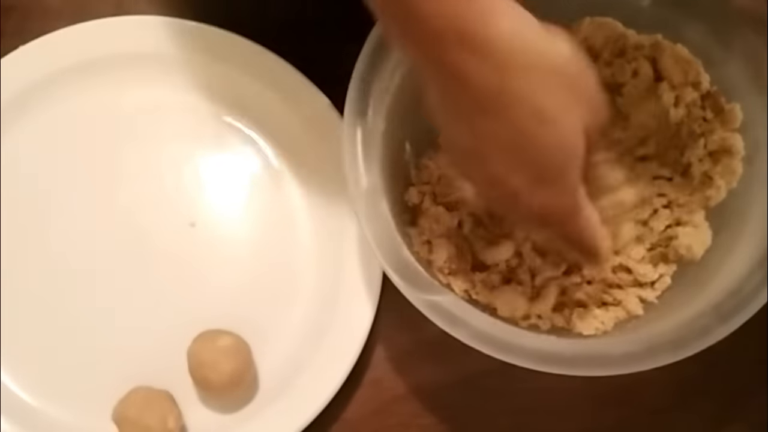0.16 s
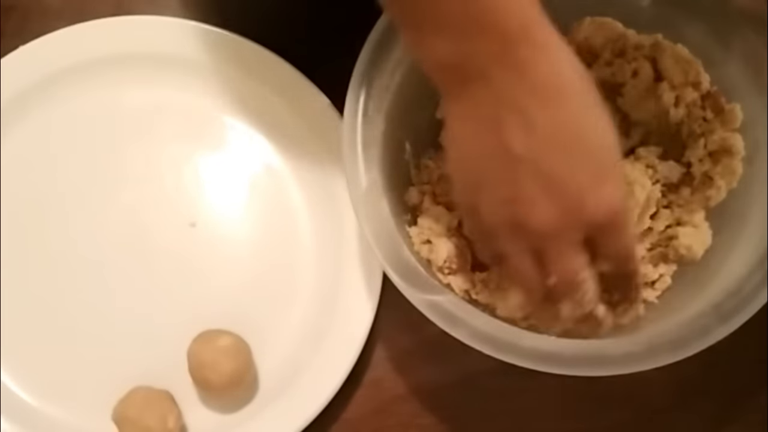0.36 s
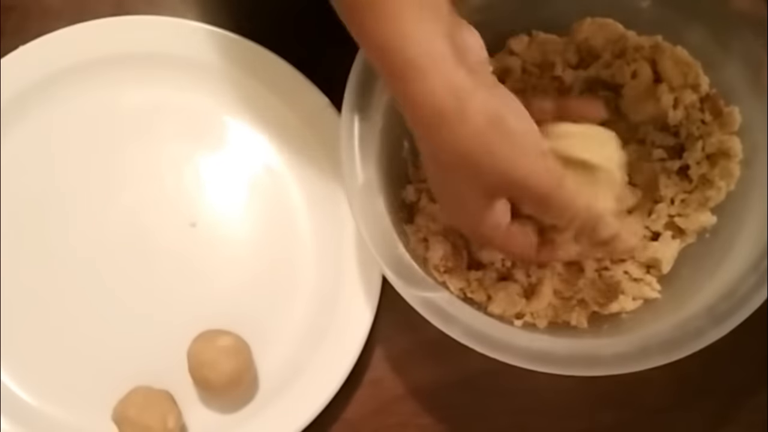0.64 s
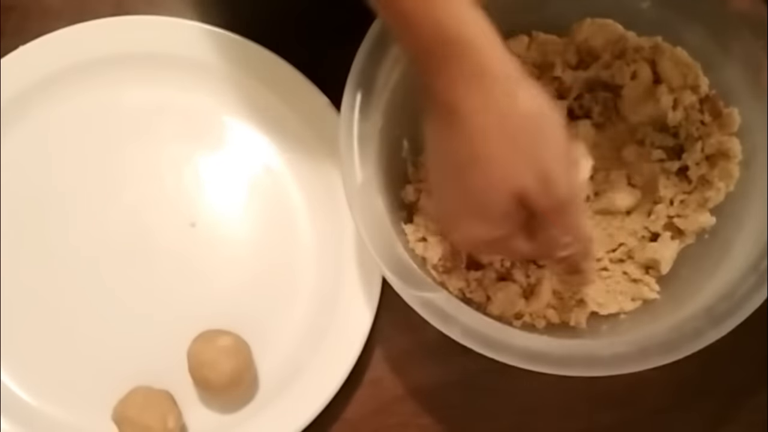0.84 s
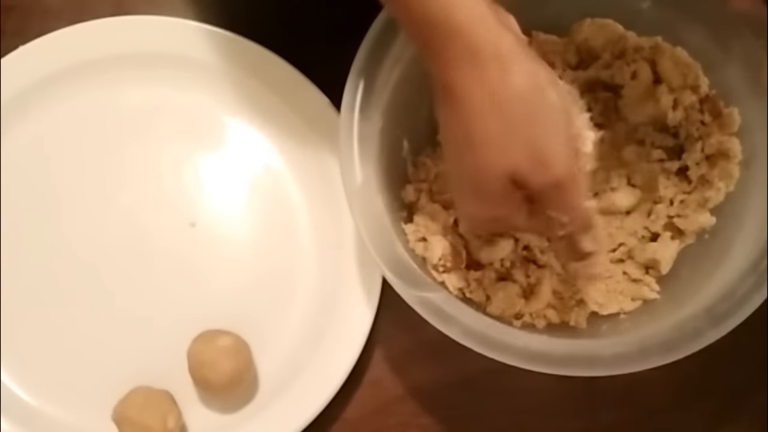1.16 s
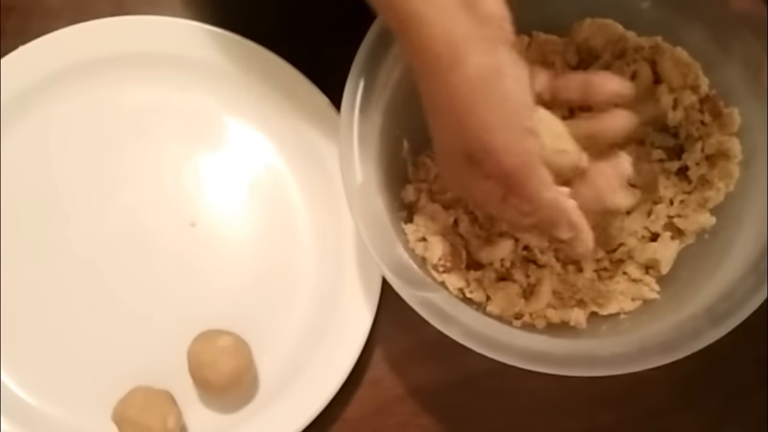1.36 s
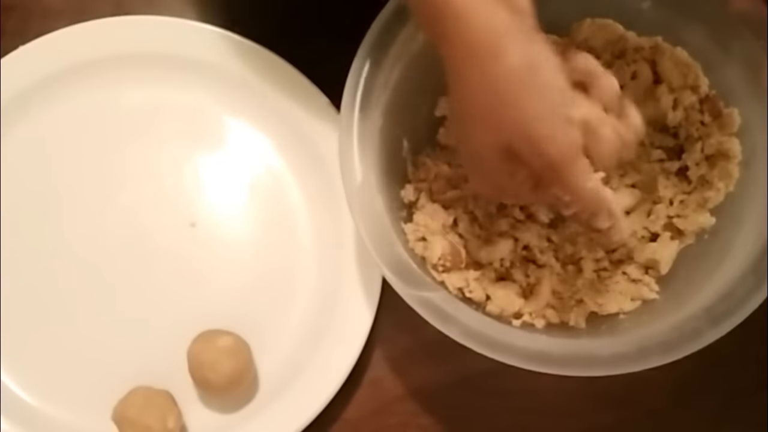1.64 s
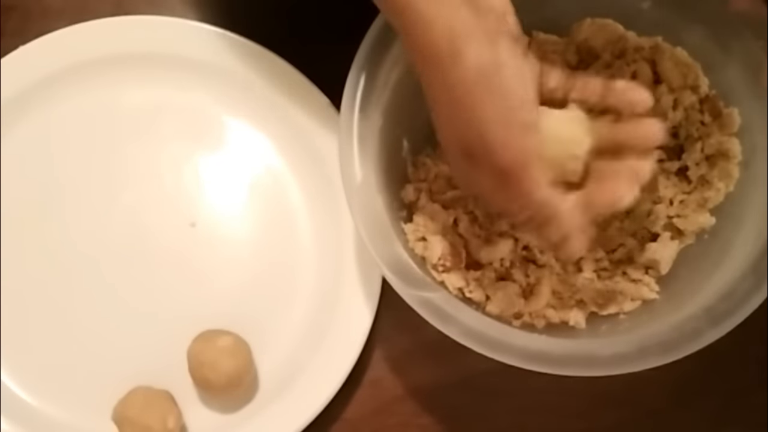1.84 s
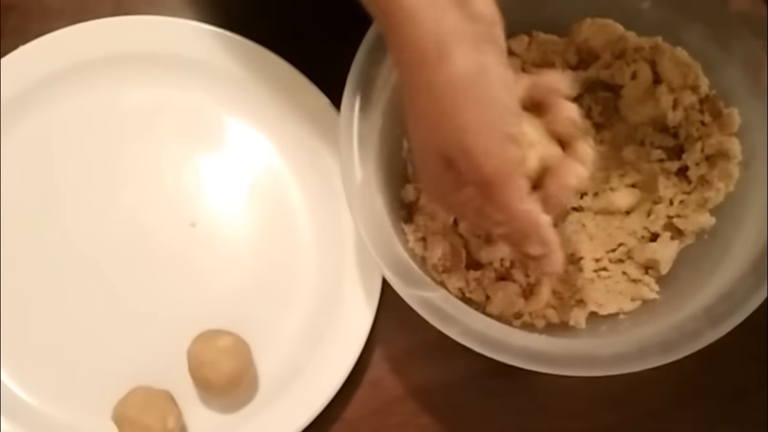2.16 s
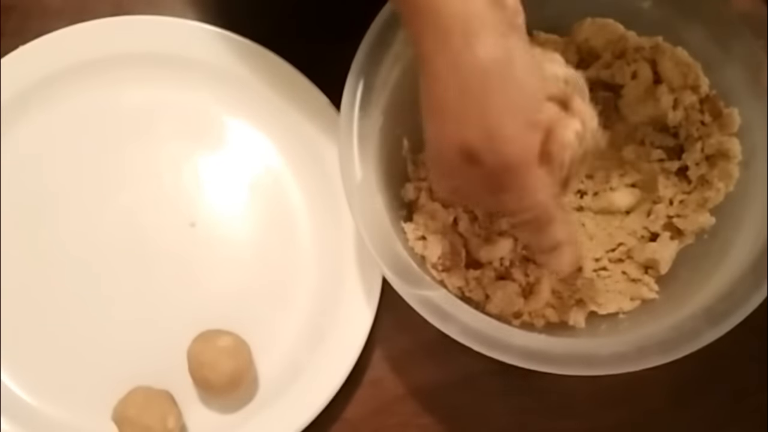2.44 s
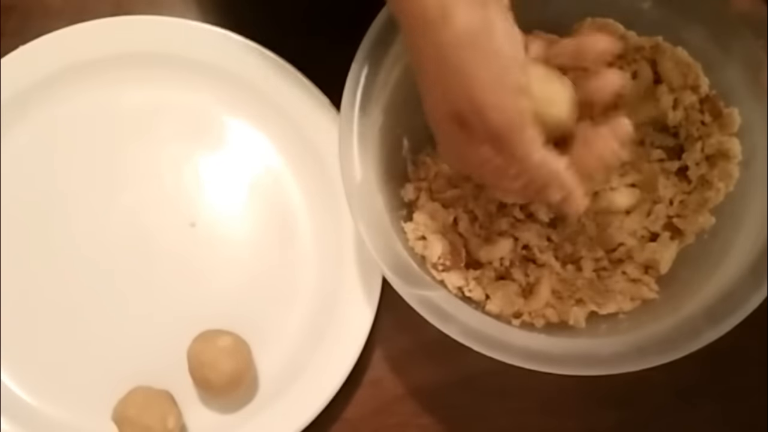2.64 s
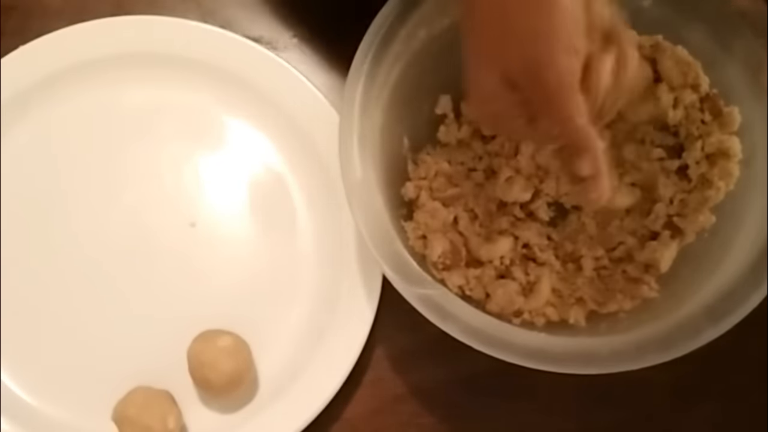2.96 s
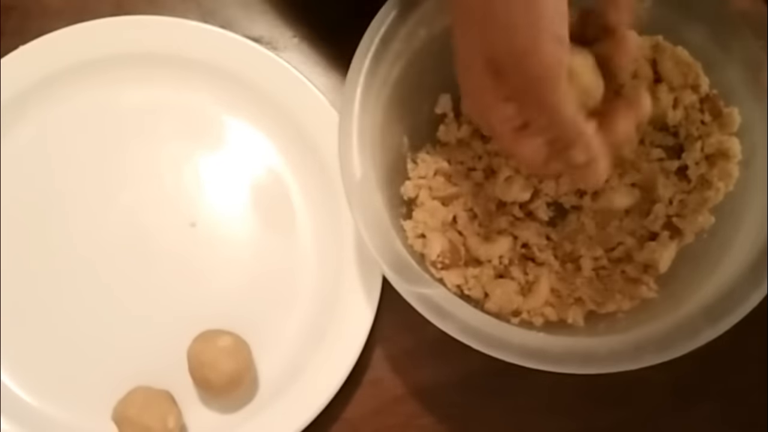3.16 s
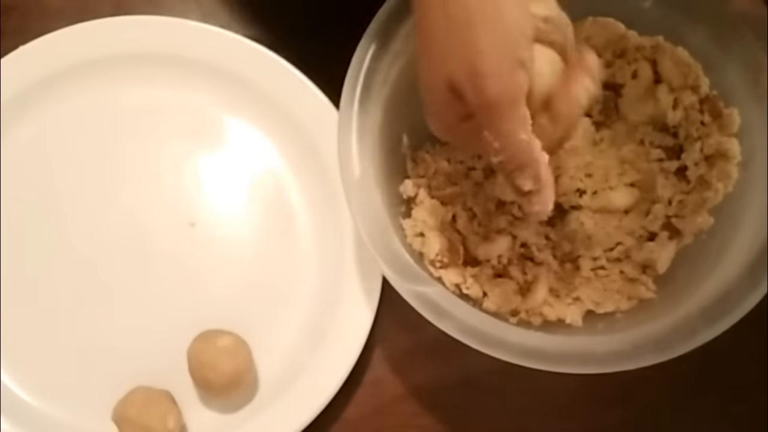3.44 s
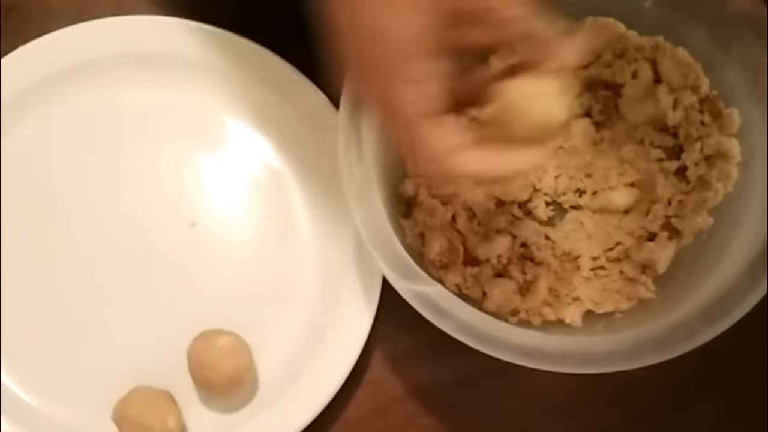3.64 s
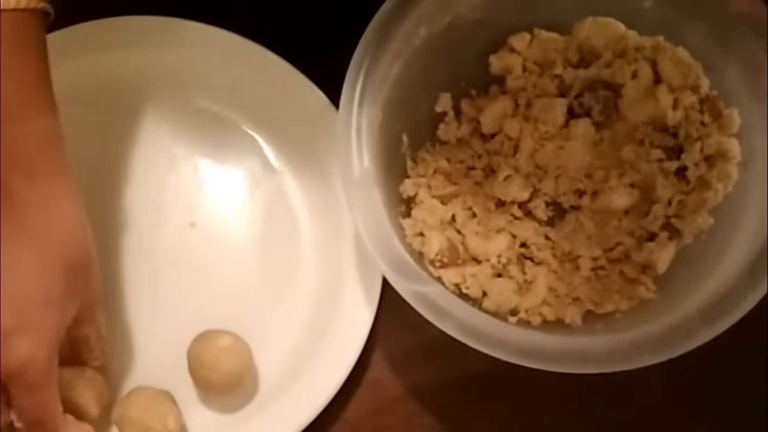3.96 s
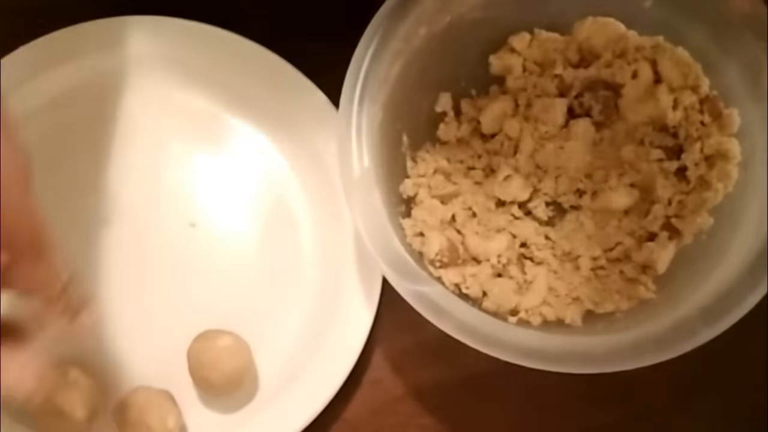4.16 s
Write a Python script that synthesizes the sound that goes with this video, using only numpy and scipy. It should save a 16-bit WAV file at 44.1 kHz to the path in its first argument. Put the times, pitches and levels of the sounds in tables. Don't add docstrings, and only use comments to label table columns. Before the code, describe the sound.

Continuous low refrigerator drone in a small indoor room, heard through a modest noisy microphone. Over it lie soft hiss, a thin mains buzz and high faint motor whines. Hand strokes in moist crumbly dough are only slight brushing rustles, rising gradually and fading quickly, clearest around the third second and in the last part. There are no bangs or sharp events, only tiny instants where the treble dips away.

```python
import sys
import numpy as np
from scipy import signal
from scipy.fft import rfft, irfft, next_fast_len
from scipy.io import wavfile
from scipy.ndimage import uniform_filter1d, map_coordinates

SR = 44100
rng = np.random.default_rng(int(sys.argv[2]) if len(sys.argv) > 2 else 0)


def to_linear_factor(level_db):
    exponent = np.asarray(level_db, float) / 20
    return 10 ** exponent


def inscribe(sig):
    pcm = np.round(np.clip(np.atleast_2d(sig).T, -1, 1) * 32767)
    wavfile.write(sys.argv[1], SR, pcm.astype(np.int16))


N = 378543


def along(points, hz):
    f_hz, value = np.transpose(points)
    return np.interp(np.log(hz + 1), np.log(f_hz + 1), value)


def wobble(rate_hz):
    coarse = np.arange(0, N + 32, 32)
    knots = rng.standard_normal(int(N * rate_hz / SR) + 4)
    return np.interp(np.arange(N), coarse, map_coordinates(knots, [coarse * rate_hz / SR]))


def filtered(x, response):
    m = next_fast_len(N + 8192)
    spectrum = rfft(x, m) * response(np.fft.rfftfreq(m, 1 / SR))
    return irfft(spectrum, m)[..., :N]


def coloured(x, tilt):
    # (frequency [Hz], level [dB per Hz])
    room_modes = [(25, -111), (40, -101), (53, -99), (63, -90), (95, -84.5), (125, -88), (141, -81.5),
                  (157, -88.5), (193, -87), (235, -83), (252, -87), (292, -82), (330, -92)]
    cabinet_panels = [(330, -91), (434, -96), (499, -91.5), (554, -96.5), (569, -104), (590, -97.5),
                      (794, -96.5), (812, -87), (830, -92.5), (849, -95), (928, -107), (960, -108),
                      (1000, -100)]
    near_surfaces = [(1000, -102), (1038, -99), (1302, -102), (1501, -96.5), (1731, -107), (1840, -103),
                     (1900, -107), (1960, -104), (2280, -114), (2380, -110), (2720, -120), (2910, -111),
                     (3022, -114), (3205, -110)]
    mic_hiss = [(3205, -110), (3384, -118), (3500, -113), (3980, -108), (4097, -111), (4218, -109),
                (5830, -116), (6548, -112), (8469, -114), (8864, -111), (10683, -110), (11229, -115),
                (11802, -133), (12100, -140)]
    colour = [(3.2, -150)] + room_modes + cabinet_panels[1:] + near_surfaces[1:] + mic_hiss[1:] + [(13000, -170)]
    return filtered(x, lambda hz: to_linear_factor(along(colour, hz) + along(tilt, hz)) * np.sqrt(SR / 2))


def patchy(size, bins, frames, depth_db):
    z = signal.stft(rng.standard_normal(N + size), nperseg=size)[2]
    field = uniform_filter1d(rng.standard_normal(z.shape), bins, 0)
    field = uniform_filter1d(field, frames, 1)
    x = signal.istft(z * to_linear_factor(depth_db * field / field.std()), nperseg=size)[1][:N]
    return x / x.std()


def tone(phase, db, sway_db):
    return np.sqrt(2) * to_linear_factor(db + sway_db * wobble(2.47)) * np.cos(phase)


def buzz():
    # (frequency [Hz], level [dB])
    buzz_tilt = [(3000, -39), (4300, -24.5), (5300, -7), (6500, -13), (7300, -22), (8200, -4), (9300, -17),
                 (10450, -9), (11600, -24)]
    mains_hz, scatter_s = 60, .0012
    cycle = SR // mains_hz
    spikes = np.zeros(N)
    spikes[::cycle] = np.sqrt(cycle)
    spikes[cycle // 2::cycle] = .3 * np.sqrt(cycle)
    scatter = rng.standard_normal(300) * np.exp(-np.arange(300) / SR / scatter_s)
    scatter = scatter / np.linalg.norm(scatter)
    return coloured(signal.fftconvolve(spikes, scatter)[:N], buzz_tilt)


def air():
    # (frequency [Hz], level [dB])
    steady_tilt = [(100, 0.5), (900, 0.5), (1500, -1), (2000, -4), (4000, -2.5), (6500, -0.5), (10000, -1)]
    return coloured(patchy(size=1024, bins=8, frames=6, depth_db=.8), steady_tilt)


def fridge():
    # (multiple of shaft speed, level [dB rms])
    hum_tones = [(1, -80.5), (2, -74.5), (3, -65.5), (4, -51.5), (5, -49.5), (6, -66), (7, -82), (8, -63.5),
                 (9, -78), (10, -84.5), (11, -80), (12, -77), (13, -74.5), (14, -83.5), (15, -78),
                 (16, -96), (17, -87.5), (18, -91), (21, -84), (22, -90), (24, -86), (25, -90), (31, -90),
                 (35, -99), (36, -97), (40, -99.5), (41, -95), (49, -99), (54, -96), (62, -102)]
    # (frequency [Hz], level [dB rms])
    fan_whines = [(2900.9, -92), (3052.3, -101), (3664, -95), (4273, -100), (4478.2, -99)]
    shaft_hz, stroke_s, panel_hz = 59.018, .00955, 325
    t = np.arange(N) / SR
    shaft = 2 * np.pi * shaft_hz * (t - stroke_s) + .02 * wobble(1.5)

    def lag(k):
        return 1.2 + np.pi * (k * shaft_hz > panel_hz) + 2 * np.pi * rng.random() * (k > 9)

    hum = sum(tone(k * shaft - lag(k), db, sway_db=0.28 + 0.022 * k) for k, db in hum_tones)
    valve = sum(tone(k * shaft - lag(k), -104 + rng.normal(0, 1.2), sway_db=-0.5) for k in range(42, 47))
    fan = sum(tone(2 * np.pi * hz * t + 1.5 * wobble(1.5), db, sway_db=1.5) for hz, db in fan_whines)
    return hum + valve + fan


def effort():
    # (let-go time [s], length [s], level against mean treble [dB])
    hand_strokes = [(0.03, .1, -3), (.25, 0.07, -2.5), (.72, 0.39, -4), (.9, 0.19, -2), (1.722, .07, -3),
                    (2.303, 0.5, -0.5), (2.848, 0.44, 5.5), (3.057, .25, 0), (3.5, 0.22, 0),
                    (3.775, 0.14, 2.5), (4.1, .3, -7), (5.0, 1, -5.5), (6.1, 2.1, -4.5), (7.136, 1.25, 1.5),
                    (7.858, .6, 2), (8.08, 0.17, -1.5), (8.58, 0.44, 3)]
    swell_power, release_s, settle_db = 0.51, 0.052, -11
    t = np.arange(0, N + 64, 64) / SR
    power = to_linear_factor(2 * settle_db)
    for let_go_s, length_s, db in hand_strokes:
        rise = np.clip(1 + (t - let_go_s) / length_s, 0, 1) ** swell_power
        fade = np.exp(-np.maximum(t - let_go_s, 0) / release_s)
        power = power + (to_linear_factor(db) * rise * fade) ** 2
    return np.interp(np.arange(N) / SR, t, np.sqrt(power))


def rustle():
    # (frequency [Hz], level [dB])
    rustle_tilt = [(600, -21), (1100, -7), (1500, -3), (1950, -1), (2700, -2), (4000, 0.5), (6000, -5.5),
                   (10000, -2), (12000, 0), (13000, 10)]
    fan_hz, beat_db = 25, 2.5
    airy_db, dulling_db_per_s = 3, .5
    ring_hz, ring_width_hz, ring_db = 1940, 92, -85
    t, strength = np.arange(N) / SR, effort()

    turn = 2 * np.pi * fan_hz * (t - .01) + .5 * wobble(3)
    beat = np.cos(turn) + .45 * np.cos(2 * turn)
    clumps = to_linear_factor(beat_db * beat + 1.1 * np.tanh(2 * wobble(60)) + 1.5 * np.tanh(wobble(110)))
    crackle = clumps * patchy(size=512, bins=8, frames=3, depth_db=1.5)
    crackle = strength * crackle / crackle.std()
    top = filtered(crackle, lambda hz: np.clip((hz - 6000) / 2500, 0, 1))
    airy = crackle + (to_linear_factor(airy_db - dulling_db_per_s * t) - 1) * top

    flecks = to_linear_factor(7.1 * beat + 4 * wobble(18)) * rng.standard_normal(N)
    flecks = filtered(flecks, lambda hz: np.exp(-((hz - ring_hz) / ring_width_hz) ** 2))
    ringing = to_linear_factor(ring_db) * strength * flecks / flecks.std()
    return coloured(airy, rustle_tilt) + ringing


def scene():
    return (buzz() + air() + fridge() + rustle())[None]


def top_cut(x):
    return signal.sosfilt(signal.butter(12, 15700, fs=SR, output="sos"), x)


def record(dry):
    # (time [s], low edge [Hz], high edge [Hz], spared band [Hz])
    dropouts = [
        (1.056, 1900, 10200, 3700),
        (3.68, 1800, 10600, 1500),
        (4.13, 2100, 10300, 4200),
        (5.023, 3300, 10200, 4100),
    ]
    # (frequency [Hz], level if flat [dB rms])
    rounding_levels = [(11000, -100), (12000, -96), (12500, -93.5), (14500, -93.5), (15700, -95)]
    half_width_s, depth, spared_half_hz = .018, .85, 250
    t, out = np.arange(N) / SR, dry
    for s, lo_hz, hi_hz, spared_hz in dropouts:
        hole = depth * np.cos(np.pi / 2 * np.clip((t - s) / half_width_s, -1, 1)) ** 2
        lost = filtered(dry, lambda hz: (hz > lo_hz) & (hz < hi_hz) & (abs(hz - spared_hz) > spared_half_hz))
        out = out - hole * lost
    rounding = filtered(rng.standard_normal(dry.shape), lambda hz: to_linear_factor(along(rounding_levels, hz)))
    return top_cut(out + rounding)


dry = scene()
out = record(dry)
inscribe(out)
```